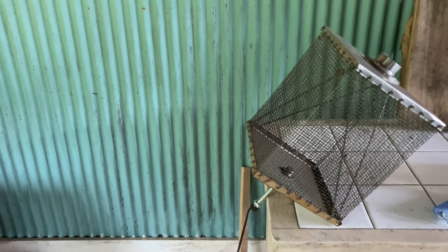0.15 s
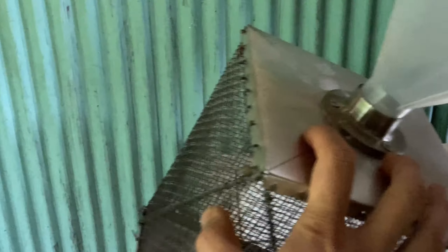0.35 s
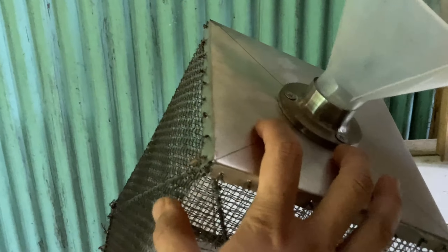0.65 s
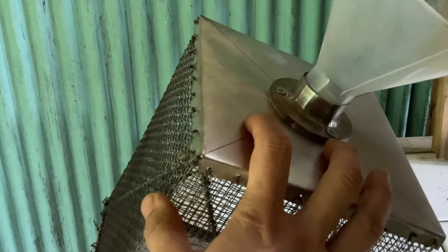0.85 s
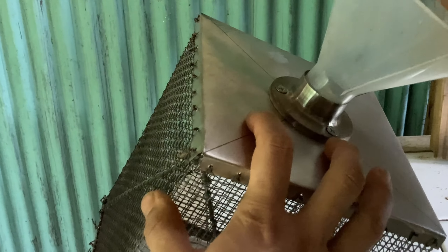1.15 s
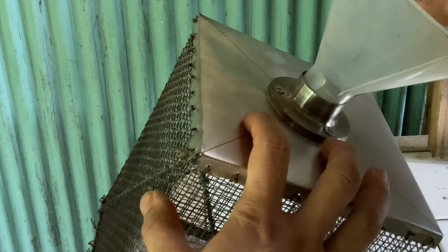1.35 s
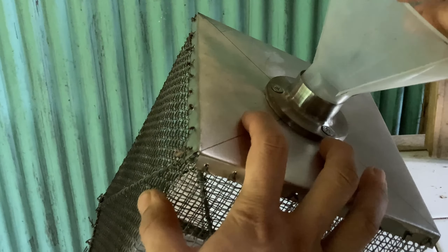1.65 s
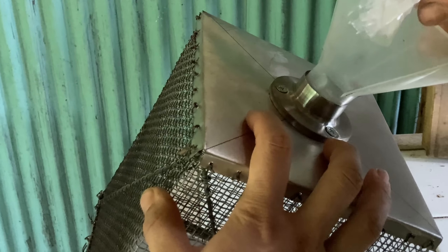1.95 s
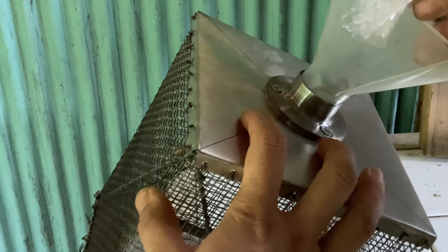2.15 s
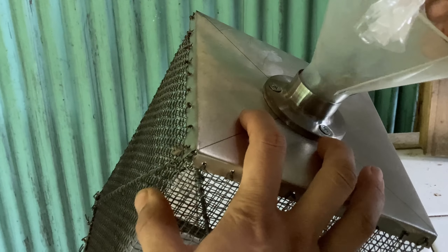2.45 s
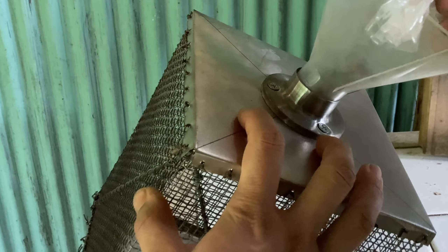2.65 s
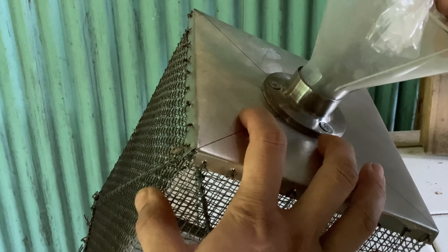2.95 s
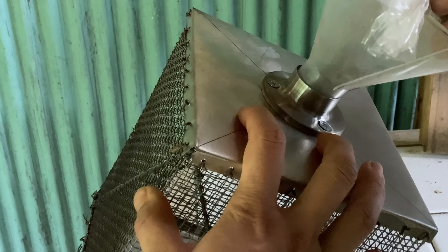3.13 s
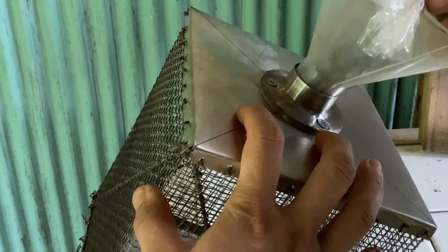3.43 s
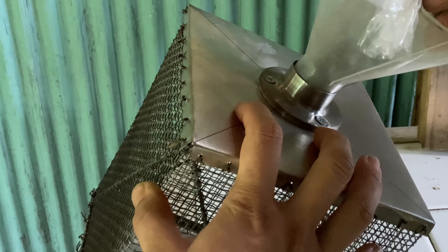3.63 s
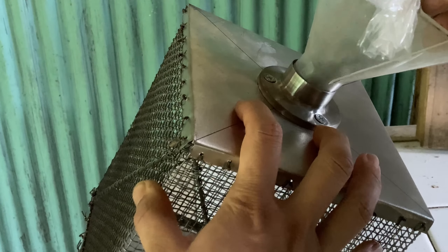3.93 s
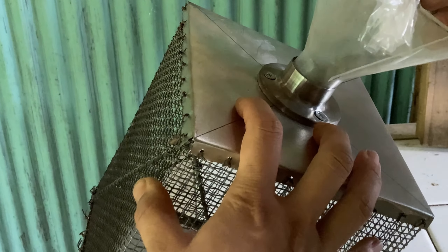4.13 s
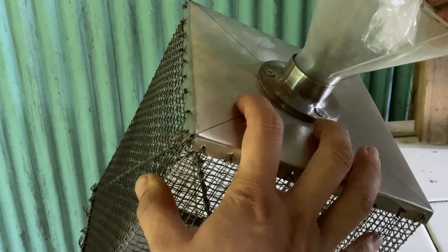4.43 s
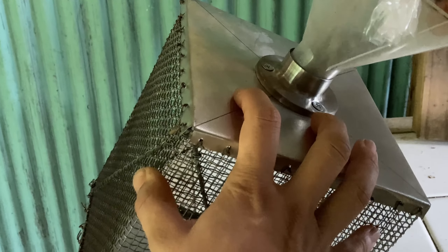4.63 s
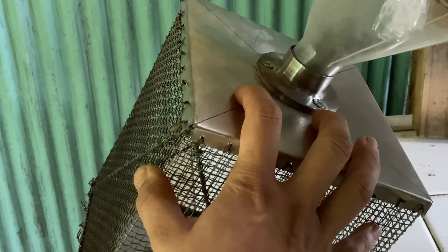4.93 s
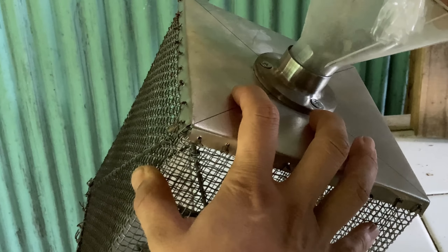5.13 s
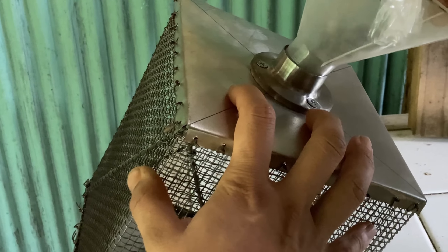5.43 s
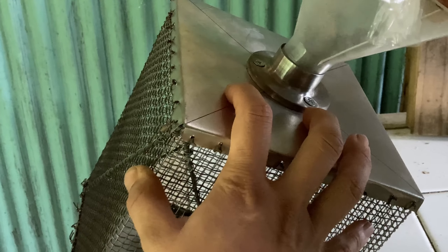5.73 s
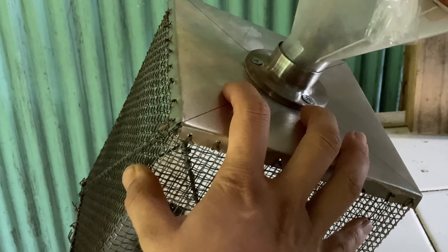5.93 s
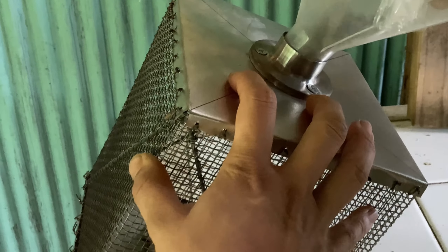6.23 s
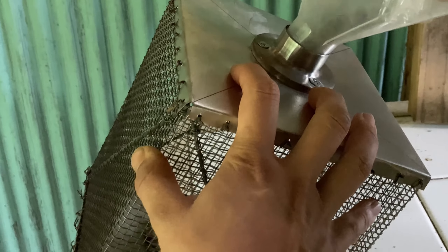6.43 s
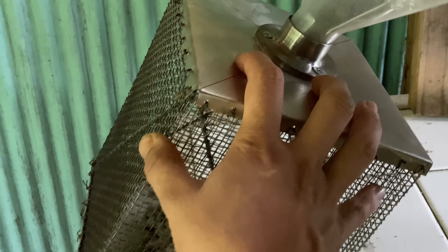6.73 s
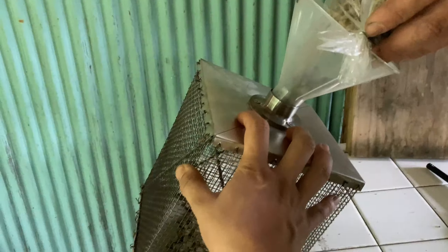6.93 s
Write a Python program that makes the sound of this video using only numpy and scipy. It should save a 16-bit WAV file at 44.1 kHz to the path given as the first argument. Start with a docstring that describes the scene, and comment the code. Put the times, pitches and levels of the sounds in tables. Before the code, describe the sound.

After quiet bumps and bag crackles, beans tick singly, rush in a bright metallic clatter, then ease into a drier, steady patter outdoors.

```python
"""Outdoors beside a metal wall, two microphone ports hear a low wash of air and a thin hiss that soon drops away.
A hand bumps and scrapes a wire mesh drum, and a plastic bag crinkles and clicks: shaped noise and sagging tones.
Dry beans drop through the neck, singly, then in clumps, then as a loud stream: noise ticks that wake resonances,
with sine notes for the wires and the end plate. As a heap builds up, beans land on beans and the rattle turns
softer and steadier. Short noise tails scatter the close sounds off the wall throughout."""
import sys
import numpy as np
from scipy import signal
from scipy.fft import rfft, irfft, next_fast_len
from scipy.io import wavfile
from scipy.ndimage import uniform_filter1d

SR = 44100
rng = np.random.default_rng(int(sys.argv[2]) if len(sys.argv) > 2 else 0)


def bounce(signal):
    """Save signal as a 16-bit WAV file at the path given by the first command-line argument."""
    frames = np.transpose(np.atleast_2d(signal))
    limited = np.clip(frames, -1, 1)
    pcm = np.round(limited * 32767).astype(np.int16)
    wavfile.write(sys.argv[1], SR, pcm)


N = 312228
TIME = np.arange(N) / SR  # seconds


def amp(db):
    """Decibels to gain."""
    return 10 ** (np.asarray(db) / 20)


def unit(x):
    """Scales to an rms of one."""
    return x / np.sqrt(np.mean(x ** 2) + 1e-20)


def curve(rows):
    """A control joined by straight lines in time."""
    return np.interp(TIME, *np.transpose(rows))


def read(points, hz):
    """A table joined by straight lines on a log-frequency axis."""
    f, value = np.transpose(points)
    return np.interp(np.log(hz + 1), np.log(f + 1), value)


def add(mix, s, sound):
    """Mixes a two-channel sound in at time s."""
    part = mix[:, max(round(s * SR), 0):][:, :sound.shape[1]]
    part += sound[:, :part.shape[1]]


def wave_sum(rates_hz):
    """Sines at the given rates with random phases, scaled to an rms of one."""
    return unit(sum(np.sin(2 * np.pi * (hz * TIME + rng.random())) for hz in rates_hz))


def ring(x, hz, sharpness):
    """A short resonance at hz, with gain one at its centre."""
    centre_hz = np.clip(hz, 100, SR / 3)
    return signal.lfilter(*signal.iirpeak(centre_hz, sharpness, fs=SR), x)


def colour(x, spectrum, modes=(), size=8192):
    """Causal (minimum-phase) filter of unit energy: a broad colour with ringing resonances on top."""
    hz = abs(np.fft.fftfreq(size, 1 / SR))
    peaks_db = sum(lift / (1 + (2 * (hz - f) / width) ** 2) for f, width, lift in modes)
    log_gain = np.log(amp(read(spectrum, hz) + peaks_db))
    minimum_phase = np.exp(np.conj(signal.hilbert(log_gain)))
    response = np.fft.ifft(minimum_phase).real[:size // 2]
    response /= np.linalg.norm(response)
    return signal.oaconvolve(x, response[None], axes=1)[:, :N]


def whiten(x, size=700):
    """Evens out the long-term spectrum, so that only the struck body sets the colour."""
    length = next_fast_len(N)
    z = rfft(x, length)
    power = uniform_filter1d(abs(z) ** 2, size, axis=1)
    return irfft(z / np.sqrt(power + 1e-9), length)[:, :N]


def patter(per_s, spread_db, tick_s, buzz_db, buzz_s, tone, sharpness, count=240, size=700):
    """Random impacts on many spots; each spot gives a broad tick, tinted by its own pitch, and a short buzz."""
    t = np.arange(size) / SR
    fade = np.exp(-t / tick_s) + amp(buzz_db) * np.exp(-t / buzz_s)
    noise = rng.standard_normal((count, 2, size)) * fade
    pitches = np.geomspace(1500, 13000, count)  # Hz
    ticks = np.array([tick + tone * ring(tick, hz, sharpness) for tick, hz in zip(noise, pitches)])
    ticks /= np.linalg.norm(ticks, axis=2, keepdims=True)
    falls = rng.random(N) < per_s / SR
    force_db = spread_db * np.minimum(rng.standard_normal(N), 2)
    force = amp(force_db) * rng.choice([-1, 1], N)
    spot = rng.integers(0, count, N)
    out = np.zeros((2, N + size))
    for i in np.flatnonzero(falls):
        out[:, i:i + size] += force[i] * ticks[spot[i]]
    return unit(whiten(out[:, :N]))


def blows(rows, rise_s, ragged_db, tail_db, tail_s, bass_hz, tone, sharpness, size=8192):
    """Each blow is a crack with its own ring that breaks up into fast rebounds, then a faint chatter."""
    t, out = np.arange(size) / SR, np.zeros((2, N))
    for s, db, decay_s, bass_db, hz in rows:
        wobble = unit(uniform_filter1d(rng.standard_normal(size), size=40))
        rebounds = amp(ragged_db * np.clip(wobble, -2, 2))
        body = np.exp(-t / max(decay_s, 1e-4))
        chatter = amp(tail_db) * np.exp(-t / tail_s)
        fade = (1 - np.exp(-t / rise_s)) * (body + chatter)
        crack = rng.standard_normal((2, size)) * fade * rebounds
        crack *= np.linalg.norm(fade) / np.linalg.norm(crack)
        bass = signal.lfilter(*signal.butter(1, bass_hz, fs=SR), crack)
        lifted = crack + (amp(bass_db) - 1) * bass
        add(out, s, amp(db) * (lifted + tone * ring(crack, hz, sharpness)))
    return out


# The open air around the drum. Each row: frequency in Hz, relative level in dB.
AIR_COLOUR = [(20, -43), (32, -30), (48, 4), (75, 5.5), (110, -1.5), (250, -2), (470, 4), (800, -11),
              (1600, -31), (4000, -30), (10000, -57), (16000, -41)]
# A thin hiss on top of the air. Each row: frequency in Hz, relative level in dB.
HISS_COLOUR = [(500, -37), (1000, -44.5), (1600, -14), (2500, -24), (3600, -22), (5500, -8), (7800, -4.5),
               (11000, -2), (13000, -21), (15500, -28)]
HISS_START_DB, HISS_HOLD_S, HISS_FADE_DB_PER_S = -51.5, 0.34, 97


def outdoors():
    """Open air as a low noise wash that swells unevenly, and a thin noise hiss that holds, then drops away."""
    swell_db = 1.4 * wave_sum(np.geomspace(1.5, 14, 10))
    air = colour(rng.standard_normal((2, N)), AIR_COLOUR) * amp(swell_db)
    hiss = colour(rng.standard_normal((2, N)), HISS_COLOUR)
    hiss_db = HISS_START_DB - HISS_FADE_DB_PER_S * np.maximum(TIME - HISS_HOLD_S, 0)
    return amp(-61.5) * air + amp(hiss_db) * hiss


# Soft bumps of the hand on the drum. Each row: start in seconds, level in dB, starting pitch in Hz.
HAND_BUMPS = [(.28, -52, 68.4), (0.371, -47, 271), (.586, -48, 370), (.65, -53, 84), (0.661, -64, 200),
              (.859, -50, 280), (1.03, -53, 265), (1.163, -47, 323), (1.37, -54, 87.5), (3.67, -44.5, 128)]
BUMP_CYCLES = 2.2  # a bump swells for this many cycles of its starting pitch, then dies away


def bumps(sag=0.28, sag_s=0.16):
    """Dull pushes of the hand; their pitch sags as the pressure eases."""
    t, out = np.arange(SR // 3) / SR, np.zeros((2, N))
    for s, db, hz in HAND_BUMPS:
        swell_s = BUMP_CYCLES / hz
        push = t / swell_s * np.exp(1 - t / swell_s)
        pitch = hz * (1 - sag * (1 - np.exp(-t / sag_s)))
        turns = np.cumsum(pitch) / SR
        shared_only = np.array([[1], [0]])  # reaches both ports
        add(out, s, amp(db) * push * np.sin(2 * np.pi * turns) * shared_only)
    return out


# Rubs of the fingers and the bag. Each row: middle in seconds, half length in seconds, scrape level in dB,
# crinkle level in dB, ring of the scrape in Hz; levels are those before the colour filters.
HAND_RUBS = [(0.345, 0.052, -56.5, -61, 272), (0.617, 0.036, -53.5, -56, 375),
             (0.765, 0.013, -56, -66, 1270), (0.804, 0.038, -60, -62, 1700), (0.88, 0.035, -67, -53, 280),
             (1.007, 0.049, -61.5, -79, 284), (1.112, 0.041, -60, -70, 1130),
             (1.234, 0.016, -58.5, -60, 900), (1.544, 0.5, -59.5, -89, 453)]
SCRAPE_REST_DB, CRINKLE_REST_DB = -64, -82  # the hand and the bag never lie quite still


def rubbing(scrape, crinkle, tone=4, sharpness=5):
    """Each rub swells and fades as a bell above the resting level; its scrape rings at a pitch of its own."""
    scraped, crinkled = amp(SCRAPE_REST_DB) * scrape, amp(CRINKLE_REST_DB) * crinkle
    for s, half_s, scrape_db, crinkle_db, hz in HAND_RUBS:
        now = np.flatnonzero(abs(TIME - s) < 2 * abs(half_s))
        bell = np.exp(-((TIME[now] - s) / half_s) ** 2)
        ringing = scrape[:, now] + tone * ring(scrape[:, now], hz, sharpness)
        scraped[:, now] += amp(scrape_db) * bell * ringing / 2
        crinkled[:, now] += amp(crinkle_db) * bell * crinkle[:, now]
    return scraped, crinkled


# Clicks of the bag and the drum being handled. Each row: start in seconds, level in dB before the mix gain,
# bass lift in dB, ring in Hz.
HANDLING_CLICKS = [(.37, -15, -14, 8200), (.408, -24.5, -13, 7600), (.499, -40, -6, 2420),
                   (.562, -32.5, -4, 3050), (0.586, -26.5, -15, 1340), (0.601, -26.5, -16, 2070),
                   (.626, -28, -15, 2090), (.646, -29, -9, 770), (.763, -43, 2, 1140),
                   (.85, -28, -10, 2930), (0.907, -20.5, -18, 7300), (1.047, -40, 9, 700),
                   (1.134, -41, -10, 3800), (1.356, -39, -21.5, 3700), (1.447, -33, 9, 850),
                   (1.469, -30, -8, 2500)]
# The plastic bag. Each row: frequency in Hz, relative level in dB.
BAG_COLOUR = [(100, 17), (400, 9.5), (1200, 7.5), (2500, 8.5), (5000, 4), (8000, 4), (11000, 7),
              (15500, -6)]
# Fingers scraping over the drum. Each row: frequency in Hz, relative level in dB.
SCRAPE_COLOUR = [(60, 1), (220, 11), (450, -2), (700, 0), (1100, -4.5), (2000, -7), (3500, -10.5),
                 (5500, -21), (15000, -42)]
CLICK_DECAY_S = 0.003


def handling():
    """The bag crinkles and clicks against the neck while the hand scrapes over the drum: patter and blows."""
    crinkle = patter(per_s=320, spread_db=2.5, tick_s=0.0024, buzz_db=-20, buzz_s=.008,
                     tone=3.1, sharpness=3.5, count=30)
    scrape = patter(per_s=350, spread_db=2, tick_s=0.002, buzz_db=-20, buzz_s=0.0069,
                    tone=2.1, sharpness=5.4, count=60)
    snaps = [(s, db, CLICK_DECAY_S, bass_db, hz) for s, db, bass_db, hz in HANDLING_CLICKS]
    clicks = blows(snaps, rise_s=0.00026, ragged_db=0.0, tail_db=-31, tail_s=0.0092,
                   bass_hz=1510, tone=2.1, sharpness=10.4)
    clicks = signal.lfilter(*signal.butter(2, 280, 'high', fs=SR), clicks)
    scrape, crinkle = rubbing(scrape, crinkle)
    return colour(crinkle + amp(-9.0) * clicks, BAG_COLOUR) + colour(scrape, SCRAPE_COLOUR)


# share of the beans that land on beans: a little at first, most of them once the heap covers the mesh
COVER_FIRST, COVER_LAST, HEAP_START_S, HEAP_GROW_S = 0.048, 0.67, 3.44, 0.83


def covered(s):
    """Share of the mesh that the heap covers at time s; it grows quickly, then levels off."""
    grown = 1 - np.exp(-np.maximum(s - HEAP_START_S, 0) / HEAP_GROW_S)
    return np.clip(COVER_FIRST + (COVER_LAST - COVER_FIRST) * grown, 0, 1)


# the beans jam and slip in the neck, so the flow surges: rms depth on the mesh and on the heap, range of rates
SURGE_MESH_DB, SURGE_HEAP_DB, SURGE_SLOW_HZ, SURGE_FAST_HZ = 1.3, .5, 10, 45


def surges(cover, count=24):
    """Gain of the random surges of the flow, which calm down as the heap grows."""
    depth_db = SURGE_MESH_DB + (SURGE_HEAP_DB - SURGE_MESH_DB) * cover
    return amp(depth_db * wave_sum(np.geomspace(SURGE_SLOW_HZ, SURGE_FAST_HZ, count)))


# Strength of the stream through the neck. Each row: time in seconds, level in dB before the mix gains.
STREAM_FLOW = [(1.55, -69), (1.746, -54), (1.978, -45.5), (2.208, -28), (2.32, -32.5), (2.37, -22.5),
               (2.5, -25), (2.53, -21), (2.79, -20), (2.83, -19.5), (3.08, -23), (3.38, -25), (3.47, -23),
               (3.57, -27), (3.8, -30.5), (3.845, -34.5), (3.89, -32), (4.24, -38), (4.34, -35),
               (4.48, -30.5), (4.54, -33.5), (5.17, -34.5), (5.22, -39.5), (5.26, -34), (5.42, -36.5),
               (6.12, -33.5), (6.22, -36), (6.26, -33), (6.4, -33), (6.46, -39), (6.49, -34.5),
               (6.95, -33.5), (7.08, -35)]
# A blow on the bare mesh. Each row: frequency in Hz, relative level in dB.
MESH_COLOUR = [(100, -27), (200, -52), (450, -18.5), (700, -22), (1450, -11), (2400, -2.5), (3400, -1),
               (5000, -4), (7400, -1.5), (8500, -2), (11000, 1.2), (13000, -4), (15500, -7)]
# A blow on the heap. Each row: frequency in Hz, relative level in dB.
HEAP_COLOUR = [(100, -40), (200, -19), (400, -25), (750, -16.5), (1450, -11), (2100, -11.5), (2700, -11),
               (3600, -4), (5000, -5.5), (7400, -6.5), (8500, -5.5), (12500, -8), (15500, -15.5)]
# Resonances and dead spots of the empty drum. Each row: frequency in Hz, width in Hz, dB above the broad colour.
EMPTY_DRUM_MODES = [(283, 24, 19), (327, 46, 27), (570, 90, 8), (648, 44, 15), (750, 36, 14.5),
                    (839, 40, 13.5), (1010, 200, 10.5), (1120, 80, 9), (1220, 70, -6), (1315, 90, 16),
                    (1470, 50, -7), (1522, 80, 11.5), (1725, 110, 7.5), (1870, 60, 6), (2030, 50, 3.5),
                    (2145, 70, 7), (2246, 42, 9), (2585, 50, 6), (2950, 70, 3.5), (3130, 110, 4.5),
                    (3350, 70, 3.5), (3720, 60, 4)]
# The same for the loaded drum. Each row: frequency in Hz, width in Hz, dB above the broad colour.
LOADED_DRUM_MODES = [(315, 60, 7), (606, 30, 3), (670, 40, 4.5), (860, 110, 7), (1128, 140, 13.5),
                     (1235, 60, -8), (1335, 100, 9.5), (1480, 70, -5), (1590, 120, 8)]


def stream():
    """A dense rattle on the ringing mesh gives way to sparser, drier ticks on the heap."""
    cover = covered(TIME)
    on_mesh = patter(per_s=2900, spread_db=3.9, tick_s=.0006, buzz_db=-12, buzz_s=.006, tone=3.5, sharpness=12)
    on_heap = patter(per_s=2600, spread_db=3.6, tick_s=.0004, buzz_db=-16, buzz_s=.005, tone=3.5, sharpness=12)
    flow = amp(curve(STREAM_FLOW)) * surges(cover)
    mesh = colour(on_mesh * flow * np.sqrt(1 - cover), MESH_COLOUR, EMPTY_DRUM_MODES)
    heap = colour(on_heap * flow * np.sqrt(cover), HEAP_COLOUR, LOADED_DRUM_MODES)
    return amp(1.0) * mesh + amp(4.0) * heap


# Hard knocks that make the end plate ping. Each row: start in seconds, level in dB, pitch in Hz.
HARD_PINGS = [(2.379, -23.5, 1073), (2.435, -20, 1320), (2.558, -20.5, 1308), (2.667, -32, 1140),
              (2.926, -26, 1340), (2.999, -22, 1096), (3.408, -27, 1280), (4.666, -31.5, 1100),
              (5.563, -32, 1097), (5.893, -34, 1330), (6.388, -28, 1150), (6.559, -33, 1124),
              (6.733, -31, 1310), (6.853, -36, 1150), (6.944, -32, 1110)]
# Notes of the end plate that the stream keeps striking. Each row: pitch in Hz, level in dB relative to the flow.
END_PLATE_NOTES = [(420, -22), (590, -18), (1050, -13), (1115, -10), (1145, -11), (1305, -10), (1345, -11),
                   (1540, -11.5), (1730, -12.5)]
# mean rate of strikes, spread of pitch (as a fraction) and of level, cycles until a note falls to 1/e
PINGS_PER_S, PING_DETUNE, PING_SPREAD_DB, PING_CYCLES = 85, .015, 2.5, 12


def pings(count=450, size=3000):
    """The end plate is struck again and again; each ping is a dying sine, a little different every time."""
    gap, pick, side = rng.random((count, 3)).T
    detune, force = np.clip(rng.standard_normal((2, count)), -2, 2)
    times = STREAM_FLOW[0][0] + np.cumsum(-np.log(1 - gap) / PINGS_PER_S)
    chosen = (pick * len(END_PLATE_NOTES)).astype(int)
    note_hz, note_db = np.array(END_PLATE_NOTES)[chosen].T
    levels = np.interp(times, *np.transpose(STREAM_FLOW)) + note_db + PING_SPREAD_DB * force
    lighter = list(zip(times, levels, note_hz * (1 + PING_DETUNE * detune), 2 * side - 1))
    hard = [(*row, 0) for row in HARD_PINGS]
    t, out = np.arange(size) / SR, np.zeros((2, N))
    for s, db, hz, apart in hard + lighter:
        fade = (1 - np.exp(-2 * hz * t)) * np.exp(-hz * t / PING_CYCLES)
        note = np.sin(2 * np.pi * hz * t) * fade
        add(out, s, amp(db) * note * np.array([[1], [2 * apart]]))
    return out


# stray hard hits within the stream: mean rate, level above the flow, range of their ring
STRAYS_PER_S, STRAY_DB, STRAY_LOW_HZ, STRAY_HIGH_HZ = 8, 5.5, 1100, 7360


def strays(count=80):
    """Beans that strike harder than the rest, at random moments and pitches, in step with the flow's strength."""
    gap, spot = rng.random((count, 2)).T
    times = STREAM_FLOW[0][0] + np.cumsum(2 * gap / STRAYS_PER_S)
    levels = np.interp(times, *np.transpose(STREAM_FLOW)) + STRAY_DB
    rings = STRAY_LOW_HZ * (STRAY_HIGH_HZ / STRAY_LOW_HZ) ** spot
    return [(s, db, 0, hz) for s, db, hz in zip(times, levels, rings) if s < N / SR]


# Single beans that stand out. Each row: start in seconds, level in dB before the mix gain, bass lift in dB,
# ring in Hz.
SINGLE_BEANS = [(1.566, -19, -20, 5630), (1.614, -21, 6, 7660), (1.618, -13, -14, 4220),
                (1.647, -17, -14, 4150), (1.654, -18.5, 3, 4430), (1.67, -19.5, -4, 5900),
                (1.694, -26, -6, 6200), (1.698, -16.5, -4, 3740), (1.703, -19, -5, 4430),
                (1.725, -27, 6, 1190), (1.731, -20.5, 6, 1750), (1.742, -19.5, 2, 1790),
                (1.754, -19, 4, 1590), (1.774, -19.5, -4, 1650), (1.787, -15, -15, 3980),
                (1.803, -25, -12, 4020), (1.834, -21, 5, 3900), (1.851, -38, 9, 1140),
                (1.862, -15.5, -1, 5040), (1.876, -22, 6, 6600), (1.904, -14.5, 1, 3500),
                (1.917, -12, -4, 3910), (1.96, -13, -9, 4500), (2.027, -17, -1, 4900),
                (2.038, -18, 6, 3800), (2.044, -14.5, -7, 2230), (2.152, -5, -8, 1120),
                (2.671, -8, -11, 2180), (2.804, -21, -3, 3270), (2.845, -8, 1, 1740), (2.969, -8, -3, 2370),
                (3.027, -6, -13, 7800), (3.208, -6, 1, 3460), (3.529, -18, 5, 1330),
                (3.587, -18, -10, 7760), (3.619, -12.5, -8, 7300), (3.878, -17, -12, 8000),
                (4.44, -17, 5, 4400), (4.494, -13, 4, 4000), (4.586, -17, -6, 3740), (5.034, -19, -8, 4830),
                (5.067, -20, -4, 3850), (5.254, -21, -6, 5000), (5.931, -19, -6, 4860),
                (6.368, -17, -4, 6540), (6.475, -13.5, 1, 6470), (6.56, -11.5, -12, 4860),
                (6.852, -11.5, 3, 4430)]
# Clumps that tumble out of the neck together. Each row: start in seconds, level in dB before the mix gain,
# decay time in seconds, bass lift in dB.
BEAN_CLUMPS = [(1.974, -14, 0.021, -20), (2.063, -4, 0.012, -23), (2.114, -4, 0.0081, 6),
               (2.241, -9.5, 0.024, 0.5), (2.257, -13.5, 0.023, 5.5), (2.32, -13, 0.073, -21),
               (2.375, -7, 0.013, 6), (2.427, -17.5, 0.018, 14), (2.442, -11.5, 0.013, 9.5),
               (2.518, -9, 0.021, -7), (2.559, -10, 0.034, 3), (2.96, -18, 0.021, 12),
               (3.091, -13.5, 0.041, -23)]
# One falling bean. Each row: frequency in Hz, relative level in dB.
BEAN_COLOUR = [(100, -30), (400, -34), (900, 6), (2400, 0.5), (4000, 9), (6500, 7.5), (10000, 9.5),
               (15500, -2)]
# A clump's crash on the mesh, leaner in the bass than the full stream. Each row: frequency in Hz, level in dB.
CLUMP_COLOUR = [(100, -52), (250, -44), (450, -27), (700, -18), (1400, -8), (2400, -1), (3400, 0.5),
                (5000, 2), (7400, 1.5), (9000, 3), (12500, 2), (15500, -7)]
# Resonances a lone bean wakes in lid and wires. Each row: frequency in Hz, width in Hz, dB above broad colour.
BEAN_MODES = [(840, 80, 2), (1125, 50, 9), (1330, 50, 7), (1530, 60, 7), (1720, 110, 10.5),
              (3750, 170, 2.5), (4300, 200, 3.5), (5230, 170, 5), (6230, 200, 5), (7300, 220, 4)]
MESH_DECAY_S, HEAP_DECAY_S = .003, .001  # a lone bean rings longer on the mesh than on the heap
CLUMP_RING_HZ = 3100


def drops():
    """Single beans tick on the drum, more drily as it fills; clumps crash on the bare mesh."""
    singles = []
    for s, db, bass_db, hz in SINGLE_BEANS + strays():
        decay_s = MESH_DECAY_S + (HEAP_DECAY_S - MESH_DECAY_S) * covered(s)
        singles.append((s, db, decay_s, bass_db, hz))
    beans = blows(singles, rise_s=.0001, ragged_db=4, tail_db=-25, tail_s=.014,
                  bass_hz=1800, tone=1.1, sharpness=9)
    clumps = blows([(*row, CLUMP_RING_HZ) for row in BEAN_CLUMPS], rise_s=0.00055, ragged_db=-0.8,
                   tail_db=-22.5, tail_s=0.058, bass_hz=1530, tone=0.33, sharpness=11.0)
    beans = colour(beans, BEAN_COLOUR, BEAN_MODES)
    clumps = colour(clumps, CLUMP_COLOUR, EMPTY_DRUM_MODES)
    return amp(-6.5) * beans + amp(-4.5) * clumps


# wires that a lone bean plucks: pitches relative to its ring, level relative to its table level, decay time
WIRE_RATIOS, WIRE_DB, WIRE_DECAY_S = (.88, 1, 1.09), -22.5, .0055


def wires(size=3000):
    """A lone bean plucks neighbouring wires: sines at close pitches, weaker as the heap covers the mesh."""
    t, out = np.arange(size) / SR, np.zeros((2, N))
    for s, db, _, hz in SINGLE_BEANS:
        turns = hz * np.array(WIRE_RATIOS)[:, None] * t + rng.random((2, len(WIRE_RATIOS), 1))
        fade = (1 - np.exp(-hz * t)) * np.exp(-t / WIRE_DECAY_S)
        notes = np.sin(2 * np.pi * turns).sum(axis=1)
        add(out, s, amp(db + WIRE_DB) * (1 - covered(s)) * fade * notes)
    return out


def wall(x, wet_db, t60, delay_s, size=12000, count=7):
    """The ribbed wall and the tiled bench scatter a short noise tail, one of several picked at random in turn."""
    t, out = np.arange(size) / SR, x.copy()
    spot = rng.integers(0, count, N)[np.arange(N) // 512]  # a new pick every 512 samples
    for k in range(count):
        onset = np.clip(t / delay_s - 1, 0, 1)
        tail = rng.standard_normal((2, size)) * amp(-60 * t / t60) * onset
        tail = signal.lfilter(*signal.butter(1, 7000, fs=SR), tail)
        tail /= np.linalg.norm(tail, axis=1, keepdims=True)
        share = np.sin(np.pi / 2 * uniform_filter1d(1. * (spot == k), size=400))  # smooth crossfade
        out += amp(wet_db) * signal.oaconvolve(x * share, tail, axes=1)[:, :N]
    return out


# How alike the two microphone ports hear. Each row: frequency in Hz, likeness from 0 to 1.
PORT_LIKENESS = [(60, .9), (150, .89), (330, .76), (550, .58), (1100, .7), (2000, .45), (3100, .52),
                 (5000, .25), (6800, .8), (9000, .88), (15000, .85)]
# Phase between the microphone ports. Each row: frequency in Hz, radians by which left leads.
PORT_LEAD = [(100, 0), (500, 0), (1500, .7), (3000, 1.5), (4500, -.6), (5500, 1.8), (6900, 0), (9100, -3.1),
             (11400, -6.3), (13700, -9.4), (16000, -12.6)]
# Balance of the microphone ports. Each row: frequency in Hz, left minus right in dB.
PORT_BALANCE = [(100, -.5), (300, -2.2), (550, 3.2), (1100, 1), (2200, 3.4), (4500, 1.2), (8000, -.1)]


def ports(x):
    """The first row reaches both ports, shifted in phase; the second is the part they do not share."""
    size = next_fast_len(N + 4096)
    shared, apart = rfft(x, size)
    hz = np.fft.rfftfreq(size, 1 / SR)
    likeness = np.clip(read(PORT_LIKENESS, hz), 0, 1)
    shared = shared * np.sqrt((1 + likeness) / 2)
    apart = apart * np.sqrt((1 - likeness) / 2)
    lean = amp(read(PORT_BALANCE, hz) / 2)
    left = (shared + apart) * lean
    right = (shared - apart) / lean * np.exp(-1j * read(PORT_LEAD, hz))
    return irfft(np.array([left, right]), size)[:, :N]


def scene():
    """The pour and the handling by the wall, in open air."""
    close = stream() + pings() + drops() + wires() + handling()
    near = wall(close, wet_db=-10.0, t60=0.25, delay_s=0.0018)
    return ports(near + bumps() + outdoors())


def record(dry):
    """The recorder's band limit: a steep low-pass."""
    low_pass = signal.firwin(401, 15900, window=("kaiser", 8), fs=SR)  # edge in Hz
    return signal.oaconvolve(dry, low_pass[None], "same")


dry = scene()
out = record(dry)
bounce(out)
```